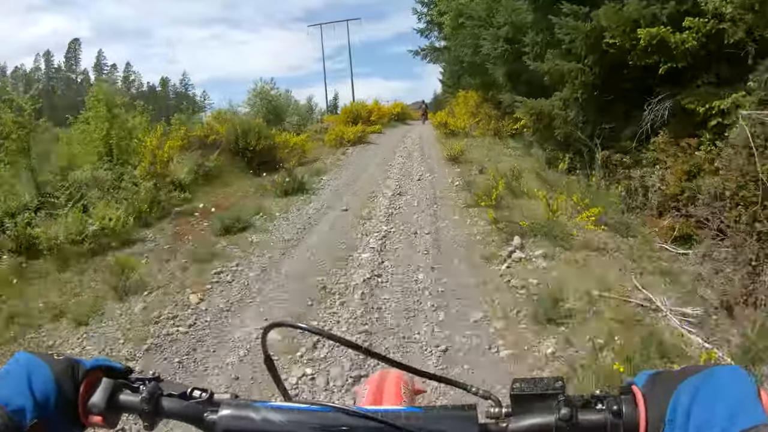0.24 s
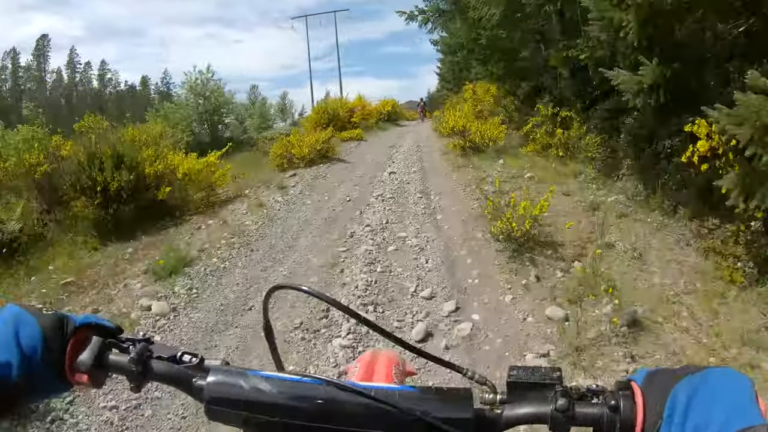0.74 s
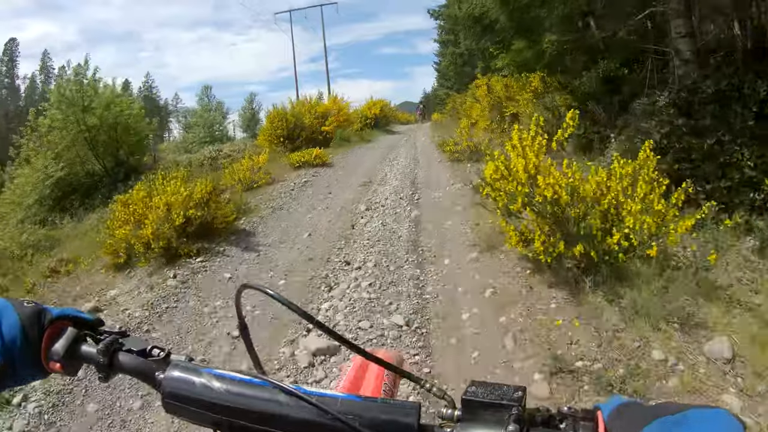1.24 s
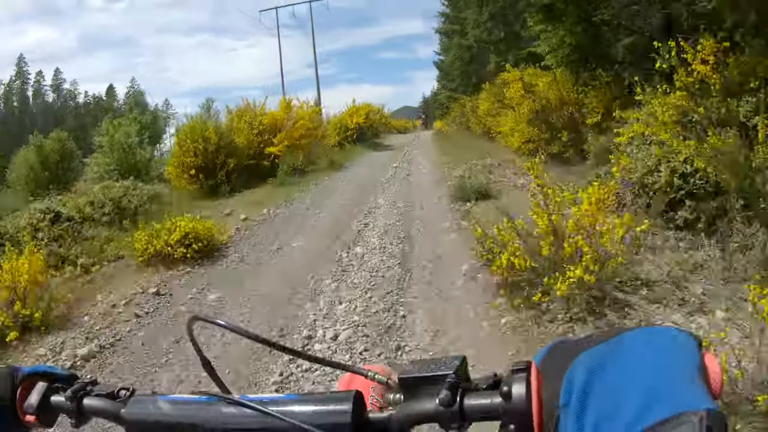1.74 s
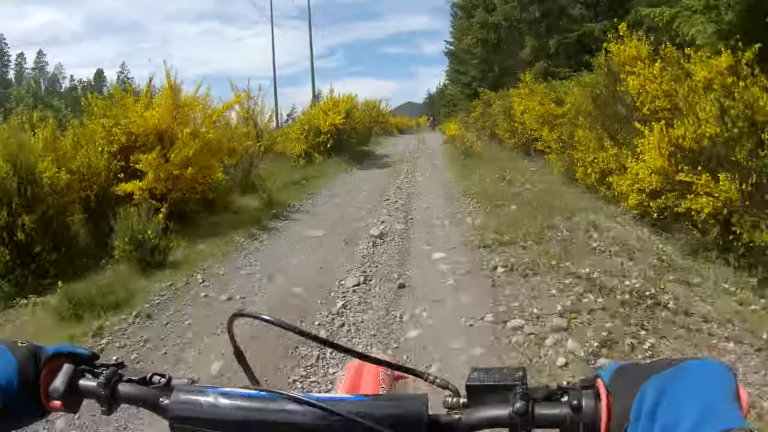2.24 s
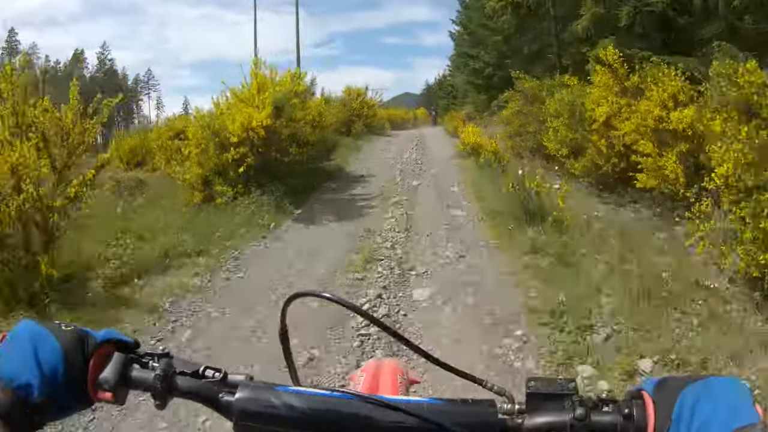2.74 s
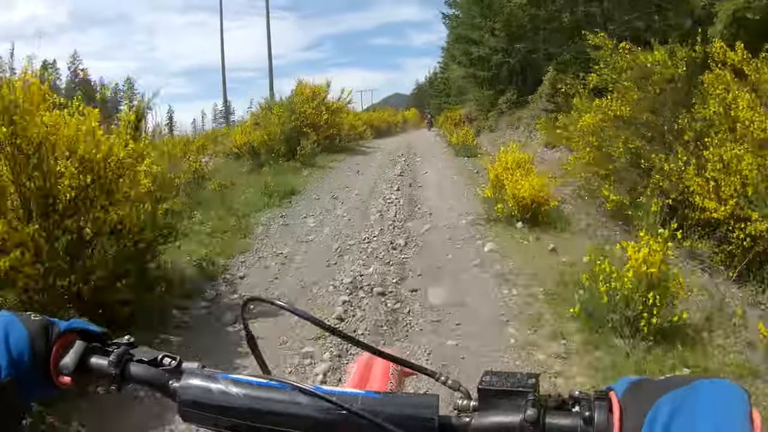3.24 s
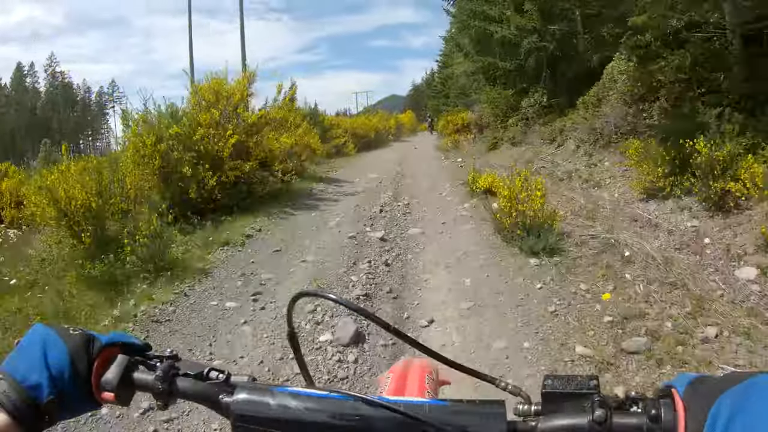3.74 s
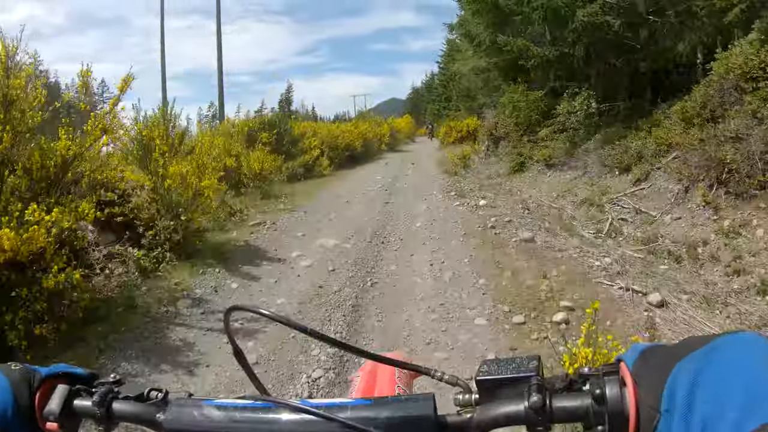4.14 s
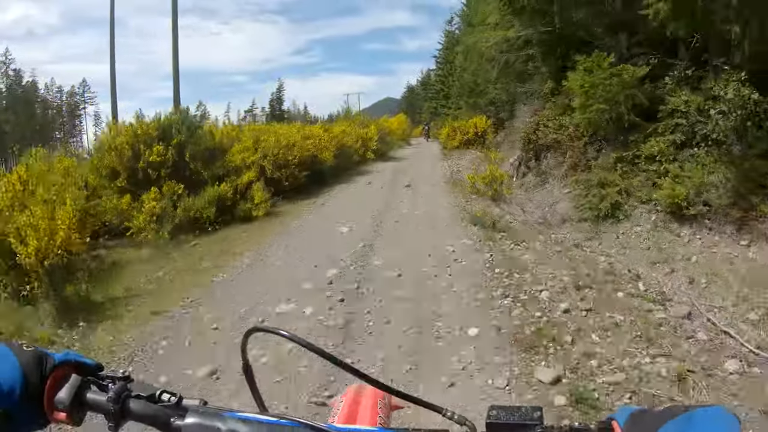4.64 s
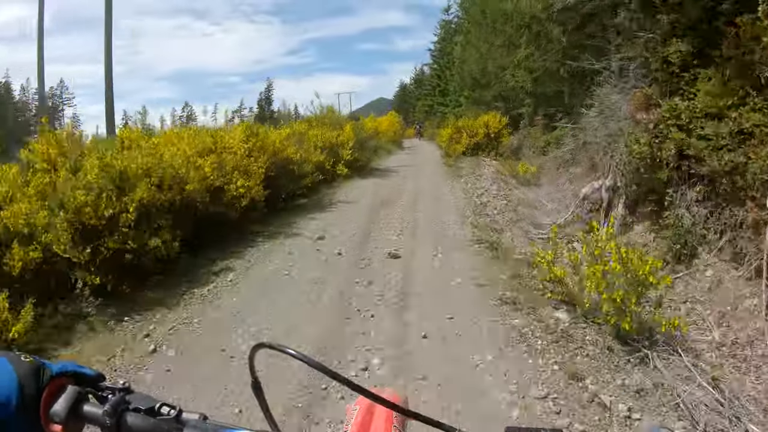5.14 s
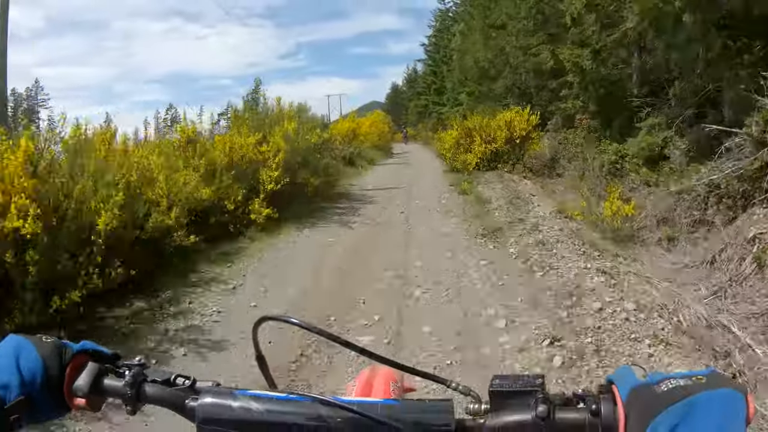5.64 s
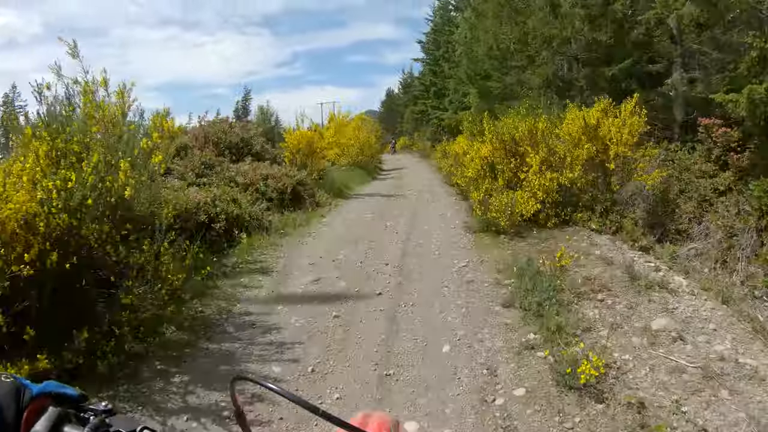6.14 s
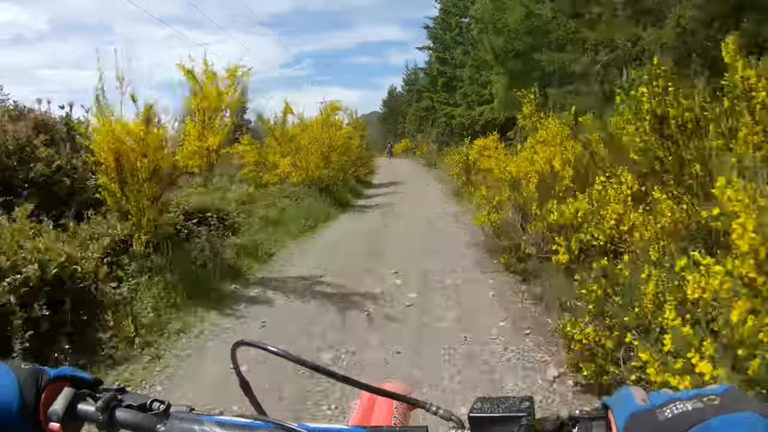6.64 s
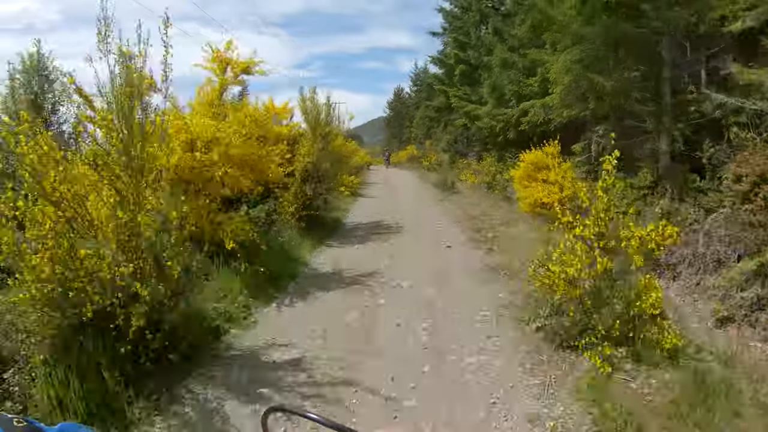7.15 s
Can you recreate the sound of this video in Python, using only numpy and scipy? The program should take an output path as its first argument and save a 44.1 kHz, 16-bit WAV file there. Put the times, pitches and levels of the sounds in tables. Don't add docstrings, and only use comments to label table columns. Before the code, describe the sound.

A single-cylinder dirt bike thumps steadily along a gravel trail, easing off, then opening up into a harder, rising bark over crunching stones and wind.

```python
import sys
import numpy as np
from scipy import signal
from scipy.fft import rfft, irfft, next_fast_len
from scipy.io import wavfile
from scipy.ndimage import uniform_filter1d

SR = 44100
rng = np.random.default_rng(int(sys.argv[2]) if len(sys.argv) > 2 else 0)


def magnitude_from_level(level_db):
    exponent = np.asarray(level_db, float) / 20
    return 10 ** exponent


def master_out(mix):
    frames = np.transpose(np.atleast_2d(mix))
    ceiling = np.clip(frames, -1, 1)
    pcm = np.round(ceiling * 32767).astype(np.int16)
    wavfile.write(sys.argv[1], SR, pcm)


N = 326340
TIME = np.arange(N) / SR

# t/s, firing rate f/Hz
REVS = [(-0.0, 53.3), (0.22, 50.55), (0.63, 51.72), (0.87, 48.63), (1.35, 49.97), (1.85, 47.51),
        (2.49, 46.1), (3.24, 44.58), (3.68, 43.98), (4.09, 46.17), (4.8, 45.11), (5.15, 47.67),
        (5.31, 49.63), (6.03, 55.09), (6.31, 59.74), (6.59, 58.87), (7.12, 62.94), (7.4, 63.43)]
# t/s, change f/Hz, half length t/s
HOPS = [(0.277, 0.63, 0.021), (0.42, 0.62, 0.02), (1.101, 1.78, 0.049), (1.576, -1.04, 0.044),
        (1.775, 0.84, 0.031), (1.857, -1.25, 0.021), (2.746, 1.83, 0.039), (3.091, 0.38, 0.053),
        (3.444, 0.85, 0.091), (3.731, 2.7, 0.057), (3.91, 2.41, 0.065), (4.216, 3.21, 0.041),
        (4.343, -1.71, 0.026), (4.448, 0.94, 0.068), (4.89, 0.66, 0.077), (5.23, 2.61, 0.08),
        (5.696, 0.11, 0.029), (6.227, 0.86, 0.021), (6.84, 1.42, 0.12), (7.067, -1.6, 0.067),
        (7.295, 1.94, 0.098)]
# t/s, level/dB
THROTTLE = [(0, 0), (.6, -0.5), (1.1, -0.5), (1.7, 0.5), (2.2, -2), (2.45, -4.5), (3.1, -3.5), (3.9, -0.5),
            (4.5, -3), (4.95, -2.5), (5.25, 5), (5.65, 5), (6.3, 6), (6.55, 5.5), (6.85, 6), (7.4, 5)]


def crank():
    hz = curves(REVS)[0] + swells(HOPS)
    load_db, = curves(THROTTLE)
    first_turn, firing_lead_s = .541, .0068
    turns = np.cumsum(hz) / SR + first_turn + firing_lead_s * hz + .004 * walk(30)
    cycle, phase = turns.astype(int), turns % 1
    since = phase / np.gradient(turns) / SR
    return hz, load_db, turns, cycle, phase, since


THROB_MULTIPLES = [-8.5, 2, -6.5, -4]
# f/Hz, level/dB
AIRBOX = [(40, 3), (110, 3.5), (130, 0.5), (152, -2), (178, 0), (192, -1.5), (206, -8.5), (250, 0.5)]
# f/Hz, t/ms
RISE_MS = [(45, 7.2), (63, 8.4), (90, 9.6), (130, 9.3), (150, 9.2), (185, 8.2), (205, 8.8), (245, 8.6)]


def airbox_throb(hz, load_db, turns):
    out = 0
    for multiple, db in enumerate(THROB_MULTIPLES, 1):
        f = multiple * hz
        gain = magnitude_from_level(db + .5 * walk(20) + np.interp(f, *np.transpose(AIRBOX)))
        rise_s = np.interp(f, *np.transpose(RISE_MS)) / 1000
        out = out + gain * np.sin(2 * np.pi * multiple * (turns - hz * rise_s))
    return level(out, -18 + 0.083 * load_db + 0.4146 * (hz - 50))


# f/Hz, start t/ms, length t/ms, skew, level/dB
PIPE = [(331, .5, 10.6, 1.25, 0)]
TAIL = [(316, .26, 14.6, .75, 0)]
BARK = [(628, 0., 12., 1., 0)]
CRACK = [(932, 1.85, 4.9, 0.84, 14), (1190, 1.403, 7.7, 0.98, -2), (1344, 1.323, 9.8, 0.73, -3),
         (1728, 1.3, 6.4, 1, -5.5), (2265, 1.4, 3.2, 0.85, -40), (3040, 1.11, 4.7, 0.93, -15)]
SNAP = [(1100, 1.75, 10, 0.41, -4.5), (1381, 1.9, 11, .55, 1.5), (1694, 1.7, 9, 0.64, -2.5),
        (2306, 1.75, 8, 0.62, -7.5), (765, 2.6, 6.3, 0.97, 4)]


def exhaust(hz, load_db, turns, cycle, since):
    heat = np.maximum(load_db + 2, 0)
    warm, short = .004 * heat, .016 * heat

    multiple = np.array([[5], [6]])
    linger_db = -4.5 + 2.45 * load_db - 10.5 * (6.5 - multiple)
    detuning = (multiple * hz - 312.5) / 8.6
    linger = magnitude_from_level(linger_db) / np.hypot(1, detuning)
    hum = -np.sum(linger * np.cos(2 * np.pi * multiple * (turns - hz * .0056)), axis=0)

    pipe_db = -17 - 0.14 * load_db - 1.5 * linger.sum(axis=0)
    pipe = rings(PIPE, since, cycle, scatter_db=.4, drift=.003, short=short)
    tail = rings(TAIL, since, cycle, scatter_db=.5, drift=.003)
    bark_db = -33 + 0.96 * load_db - 0.04 * (hz - 50)
    bark = rings(BARK, since, cycle, scatter_db=1., drift=.005, warm=warm, short=short)
    crack = rings(CRACK, since, cycle, scatter_db=1.2, drift=.004)
    snap = rings(SNAP, since, cycle, scatter_db=1., drift=.003)
    drone = np.sin(2 * np.pi * 5 * (turns - hz * .0067))

    out = magnitude_from_level(pipe_db) * (pipe + magnitude_from_level(-14) * tail + hum) + magnitude_from_level(bark_db) * bark
    out = out + magnitude_from_level(1.3 * load_db - 36) * crack
    out = out + magnitude_from_level(-38 + 0.68 * (hz - 63)) * snap
    return out + magnitude_from_level(-29.5 - 3.5 * (hz - 45)) * drone


# f/Hz, level/dB
RASP = [(1000, -3), (1400, -3.5), (1900, 14), (2500, -1), (3200, 3), (4500, -13)]


def gas_rasp(load_db, cycle, since):
    uneven = magnitude_from_level(rng.standard_normal(N // 500)[cycle])
    opening = np.clip((since - .0015) / .001, 0, 1)
    puff = .12 + opening * np.exp(-(since - .0025) / .004) * uneven
    hiss = rush(RASP, swell_db=.3, flicker_db=1.3, rate=10)
    return magnitude_from_level(0.9 * load_db - 44) * level(puff * hiss, 0)


# f/Hz, width f/Hz, place in the cycle [0-1], share of the cycle [0-1], level/dB
VALVES = [
    (4790, 350, 0.51, 0.2, -3),
    (9050, 1670, .45, .14, 3.5),
    (12000, 1300, 0.3, .12, -9),
    (8780, 300, 0.3, 0.27, -7),
]
# t/s, louder by level/dB, half length t/s
RATTLES = [
    (.5, 3, 0.1),
    (1.5, 3.5, 0.51),
    (2.55, 1, 0.36),
    (3.9, 0, 0.3),
    (4.7, 2.5, 0.86),
]
# t/s, louder by level/dB, half length t/s
COASTING = [
    (1.7, 1, 0.46),
    (4.8, 4.5, .4),
]


def valve_gear(load_db, phase):
    out = 0
    slack_db = -.2 * load_db + swells(RATTLES)
    part_db = (-54 + swells(COASTING), -60, -60, -60)
    for (f, width, place, share, db), now_db in zip(VALVES, part_db):
        distance = (phase - place + .5) % 1 - .5
        gate = 0.26 + np.exp(-(distance / share) ** 2)
        tick = gate * band(rng.standard_normal((2, N)), f, width, order=2)
        out = out + level(tick, db + now_db + slack_db + 1.4 * walk(3.6))
    return out


# f/Hz, width f/Hz, level/dB
BUZZ = [(1070, 60, -51), (1380, 60, -52), (1680, 70, -51), (2370, 70, -54), (2950, 120, -57),
        (3800, 100, -60)]


def frame_buzz(load_db):
    out = 0
    for f, width, db in BUZZ:
        buzz = band(rng.standard_normal((2, N)), f, width, order=2)
        out = out + level(buzz, db + .6 * load_db + 2 * walk(3))
    return out


def engine():
    hz, load_db, turns, cycle, phase, since = crank()
    tone = airbox_throb(hz, load_db, turns) + exhaust(hz, load_db, turns, cycle, since)
    noise = gas_rasp(load_db, cycle, since) + valve_gear(load_db, phase) + frame_buzz(load_db)
    return tone + noise


# f/Hz, level/dB per Hz
GRAVEL = [(480, 6), (700, 1), (1000, 0), (1500, -2.5), (2300, -5.5), (3300, -11), (5500, -15), (8800, -19),
          (11000, -33.5), (13000, -39), (15300, -48)]
# t/s, louder by level/dB, half length t/s
PATCHES = [
    (.28, 3, .06),
    (.9, 1, 0.59),
    (1.75, 4.5, 0.41),
    (2.65, 2, .12),
    (3.05, 3, 0.054),
    (4.1, 2.5, 0.41),
    (6.2, 3, 0.35),
    (7.2, 2.5, 0.36),
]


def gravel():
    hits = rng.random(N) < 700 / SR
    grains = hits * magnitude_from_level(3.2 * rng.exponential(size=N)) * rng.choice([-1, 1], N)
    crunch = rush(GRAVEL, swell_db=0.49, flicker_db=1.42, rate=16, source=0.74 * grains)
    return magnitude_from_level(-37.5 + swells(PATCHES)) * crunch


# t/s, peak level/dB, f/Hz
STONES = [(0.251, -33.5, 4090), (0.9764, -32, 4100), (1.1937, -33, 4320), (1.8767, -25, 4100),
          (2.7168, -28, 4310), (3.052, -30.5, 4990), (3.503, -42, 3970), (3.745, -40, 4430),
          (3.7968, -36.5, 4360), (3.8285, -42, 4360), (3.859, -32, 4070), (3.936, -29, 5830),
          (4.1689, -26, 6200), (4.1906, -28, 4200), (4.448, -28.5, 5150), (4.5804, -40.5, 4340),
          (4.836, -34, 4770)]


def stones():
    out = np.zeros((2, N))
    age = TIME[:SR // 40]
    for s, db, hz in STONES:
        i = int(s * SR)
        knock = rng.standard_normal((2, len(age))) * np.exp(-age / .007) * (1 - np.exp(-age / .003))
        knock = band(knock, np.clip(hz, 1000, 12000), 1.2 * hz, order=2)
        out[:, i:i + len(age)] += magnitude_from_level(db - 1) * knock / (np.abs(knock).max() + 1e-9)
    return out


# f/Hz, level/dB per Hz
GUST = [(20, 0), (40, 0.5), (90, -5), (150, -9.5), (210, -16), (300, -11.5)]
# t/s, louder by level/dB, half length t/s
GUSTS = [(.35, 6, 0.31), (.9, 7, 0.17), (1.4, -1, 0.36), (1.8, 5.5, 0.31), (2.25, 1, 0.069),
         (3.5, -0.5, 0.16), (4.35, 3, 0.47), (4.9, 5.5, 0.21), (5.4, 0, 0.26), (6.05, 4, 0.49),
         (6.9, 3, 0.27)]


def wind():
    buffets = rush(GUST, swell_db=.8, flicker_db=1.9, rate=14)
    common, opposed = magnitude_from_level(-34.5 + swells(GUSTS)) * buffets
    return magnitude_from_level(5.5) * common + magnitude_from_level(-1) * opposed * np.array([[1], [-1]])


# f/Hz, left lead [radians], left minus right level/dB, likeness [0-1]
PORTS = [(101, 0.055, 3, 0.9), (375, 0.14, 0.4, 1), (574, 0.67, 5.5, 0.66), (774, 1.11, 6, 1),
         (1037, 2.64, 2.5, 0), (1078, 4.9, 4.5, 0), (1250, 6, 5.5, 0.27), (2280, 5.02, 5, 1),
         (3420, 6.3, 2.5, 0.78), (4930, 7.16, 0.1, 1), (9100, 8.2, 1.2, 0.3), (14900, 27, 5.5, 0.1)]


def ports(pair):
    size = next_fast_len(N)
    bins_hz = np.arange(size // 2 + 1) * SR / size
    hz, *columns = np.transpose(PORTS)
    lead, shade_db, like = (np.interp(bins_hz, hz, c) for c in columns)
    like = np.clip(like, 0, 1)
    a, b = rfft(pair, size)
    left = magnitude_from_level(shade_db / 2) * np.exp(.5j * lead)
    right_sound = like * a + np.sqrt(1 - like ** 2) * b
    return irfft(np.array([a * left, right_sound / left]), size)[:, :N]


def rings(modes, since, cycle, scatter_db, drift, warm=0, short=0):
    out = 0
    for hz, start_ms, length_ms, skew, db in modes:
        size, tune = rng.standard_normal((N // 500, 2))[cycle].T
        age = since - start_ms / 1000
        progress = np.clip(age * 1000 / length_ms / (1 - short), 0, 1)
        gate = np.sin(np.pi * progress ** skew)
        warmed_age = age + warm * (since - .0058)
        tone = np.sin(2 * np.pi * hz * (1 + drift * tune) * warmed_age)
        out = out + magnitude_from_level(db + scatter_db * size) * gate * tone
    return level(out, 0)


def rush(colour, swell_db, flicker_db, rate, source=0):
    hz, db = np.transpose(colour)
    out, swell = 0, swell_db * walk(rate / 2)
    count = int(2 * np.log2(hz[-1] / hz[0])) + 1
    for f in np.geomspace(hz[0], hz[-1], count):
        gain = magnitude_from_level(np.interp(np.log(f), np.log(hz), db) + swell + flicker_db * walk(rate))
        out = out + gain * band(rng.standard_normal((2, N)) + source, f, f / 3, order=2)
    return level(out, 0)


def band(x, hz, width, order=1):
    top = width / 2 + np.hypot(width / 2, hz)
    return signal.sosfilt(signal.butter(order, [top - width, top], "band", fs=SR, output="sos"), x)


def walk(rate):
    k = int(SR / rate)
    held = np.repeat(rng.standard_normal(N // k + 1), k)
    return uniform_filter1d(uniform_filter1d(held, k), k)[:N] * 4 / 3


def swells(table):
    return sum(size * np.exp(-((TIME - s) / np.maximum(half_s, .01)) ** 2) for s, size, half_s in table)


def curves(table):
    s, *columns = np.transpose(table)
    return [np.interp(TIME, s, c) for c in columns]


def level(x, db):
    return x * magnitude_from_level(db) / np.sqrt(np.mean(x ** 2))


def scene():
    return ports(engine() + gravel() + stones()) + wind()


def roll_off(x):
    return signal.sosfilt(signal.butter(12, 15480, fs=SR, output="sos"), x)


def record(dry):
    mix = np.tanh(0.65 * dry) / 0.68
    return roll_off(mix)


dry = scene()
out = record(dry)
master_out(out)
```